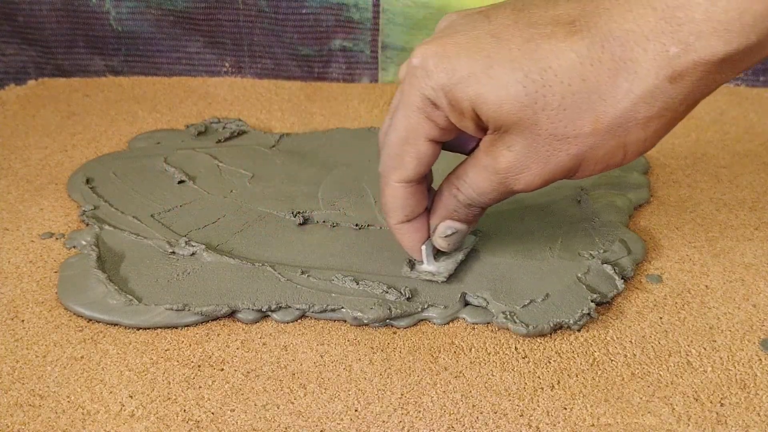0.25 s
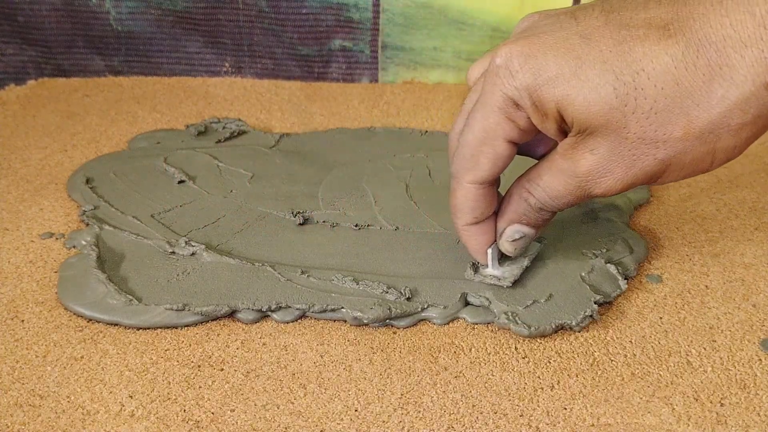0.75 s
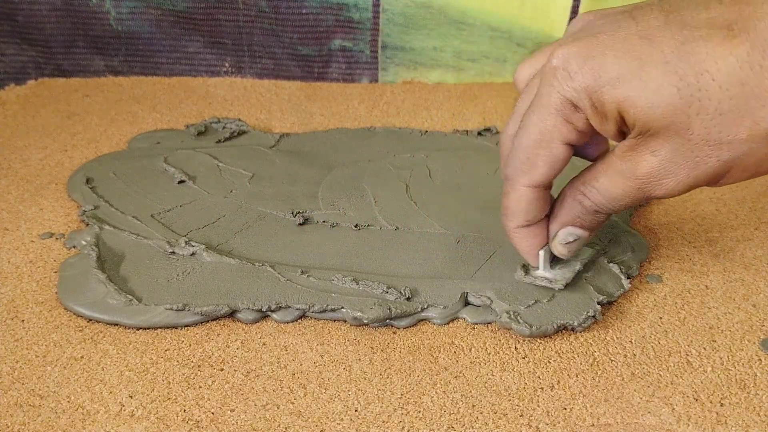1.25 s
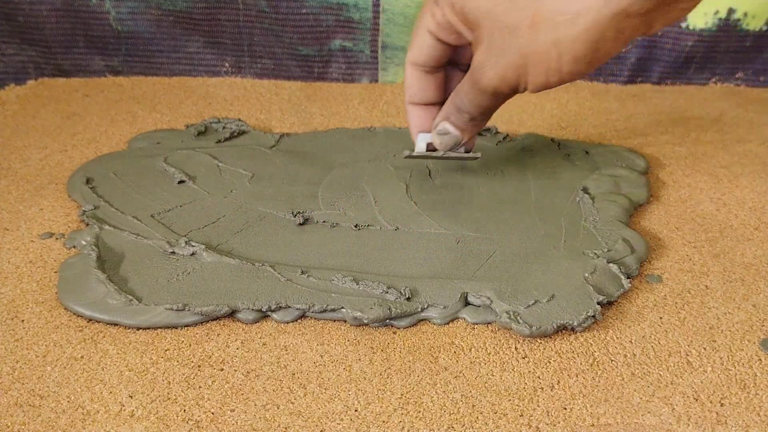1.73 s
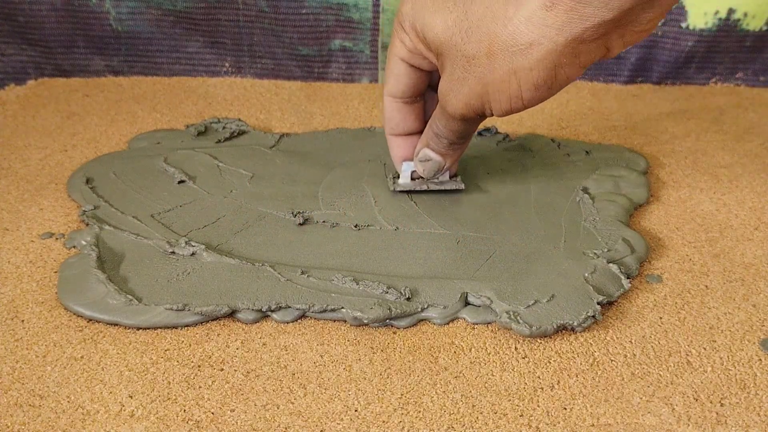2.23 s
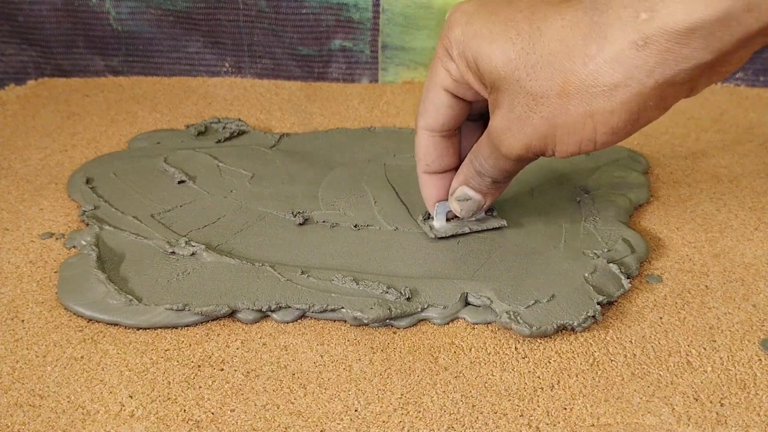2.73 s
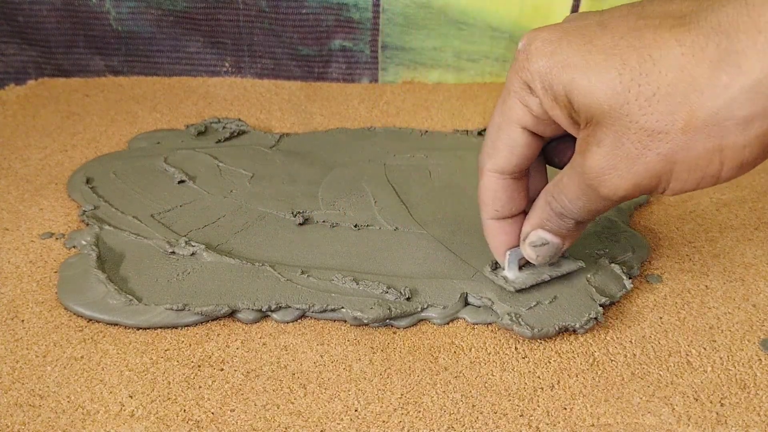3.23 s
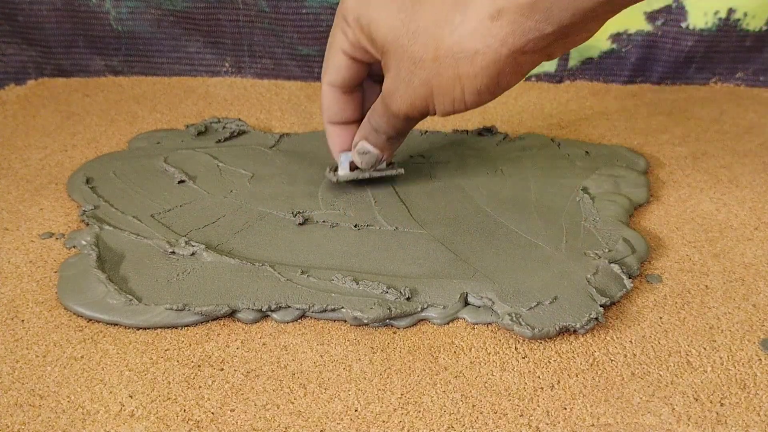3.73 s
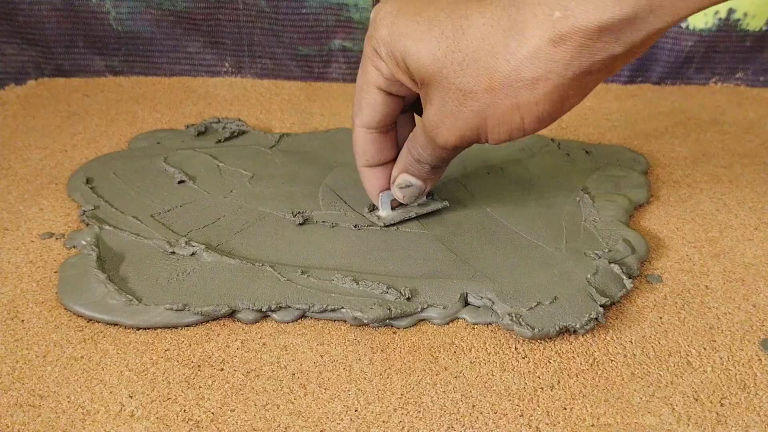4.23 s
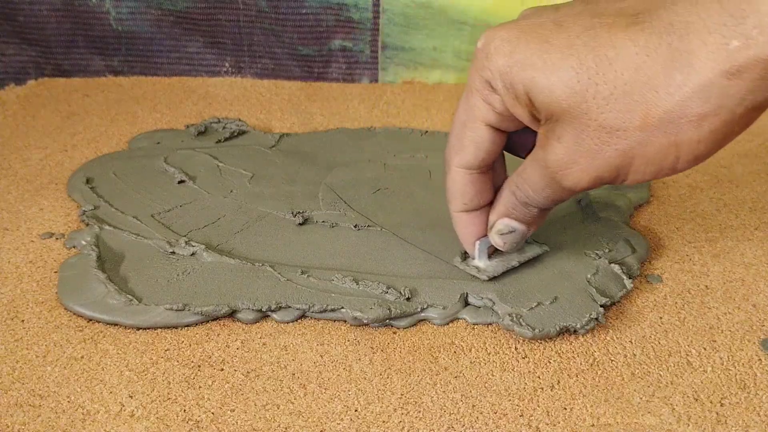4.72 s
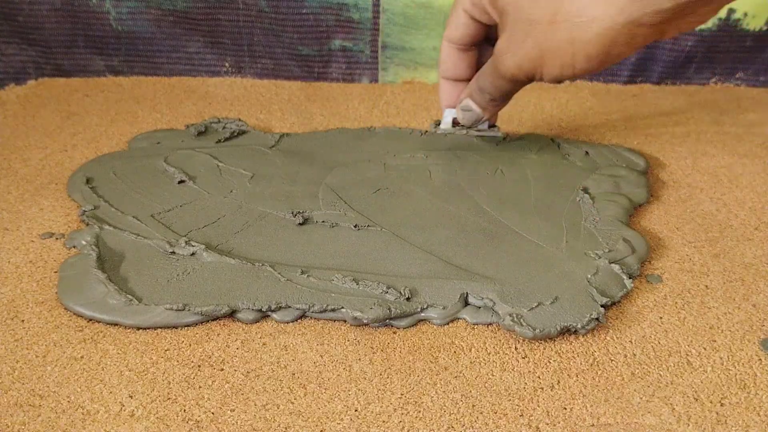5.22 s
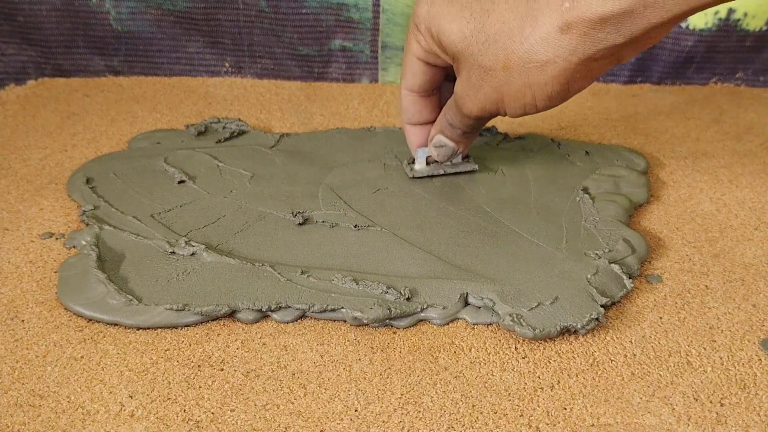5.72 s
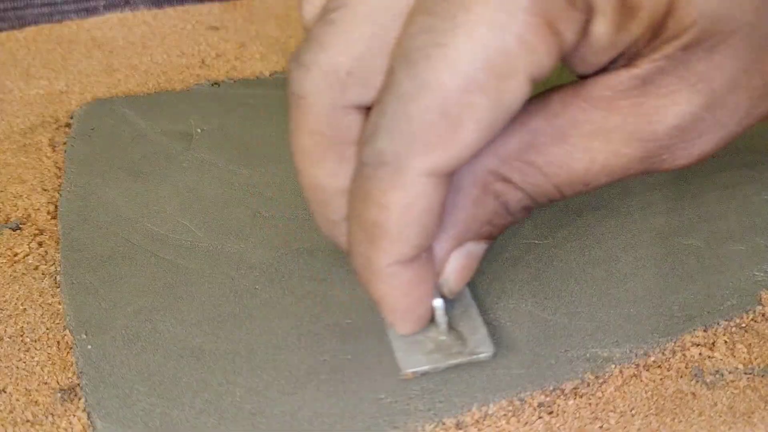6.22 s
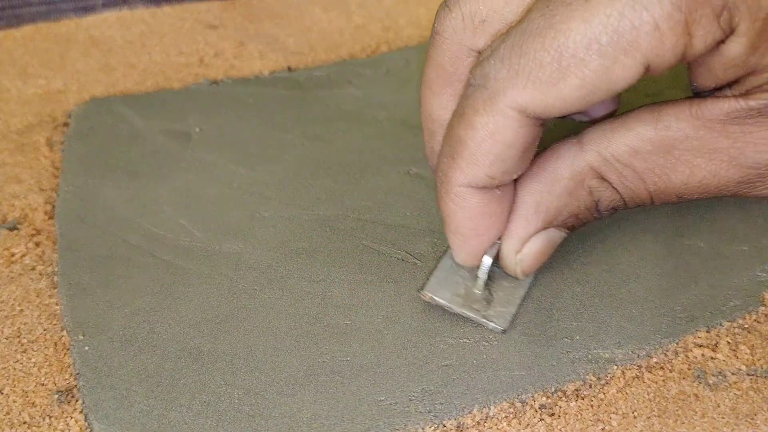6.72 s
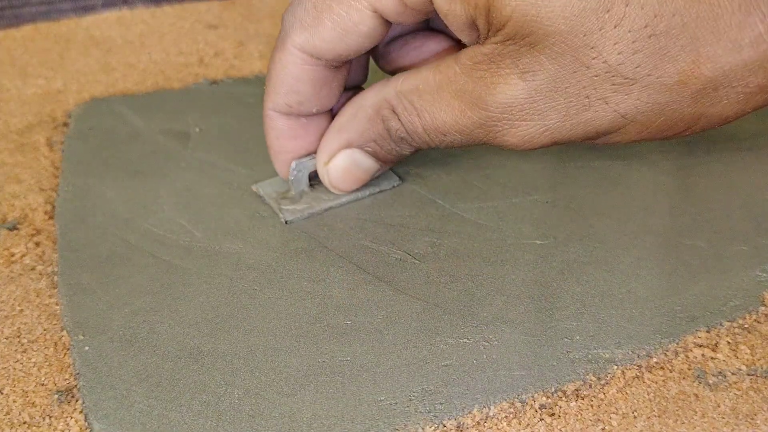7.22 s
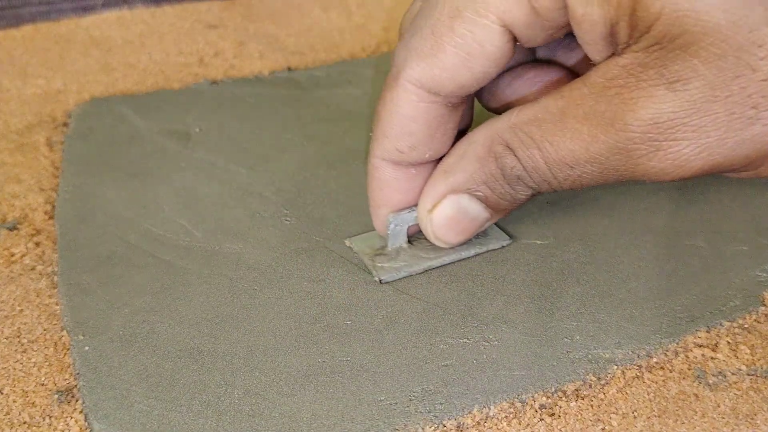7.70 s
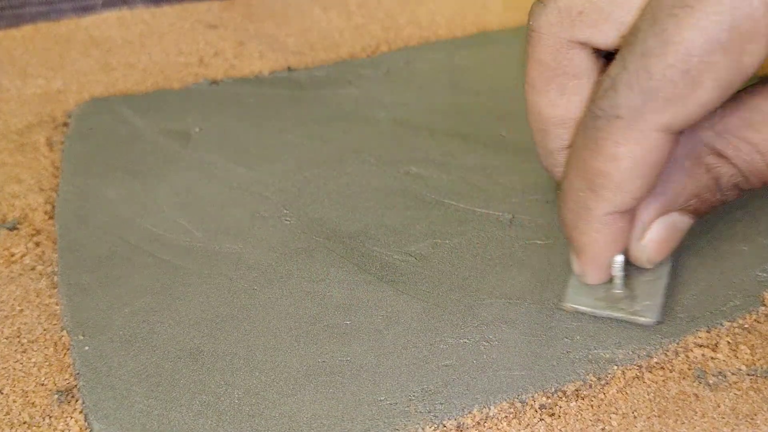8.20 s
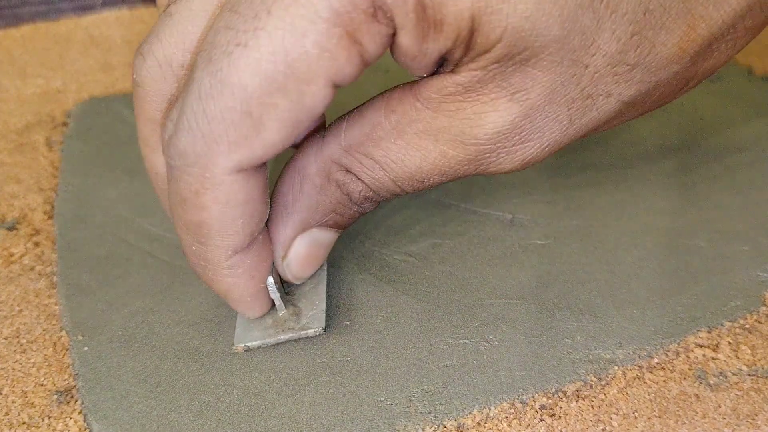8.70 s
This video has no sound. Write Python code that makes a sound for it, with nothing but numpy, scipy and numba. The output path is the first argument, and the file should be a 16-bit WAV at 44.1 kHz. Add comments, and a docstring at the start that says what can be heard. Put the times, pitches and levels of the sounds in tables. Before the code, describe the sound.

A hand draws a small steel trowel across wet cement in a quiet indoor space, heard very close and dry. Gritty, bright scrapes last under a second each, flecked with grain scratches and small catches. Each stops suddenly, and most leave a faint, thin metallic ring before the next begins. Some strokes turn hollow towards the end.

```python
"""A gritty scrape comes and goes in strokes: a steel trowel is drawn over wet cement in a quiet room.
Random clicks, the sand grains under the edge, drive resonators for the cement-damped blade and the slab,
and third-octave bands for the bare scrape. At each lift the scrape fades fast and most lifts leave the
freed blade modes ringing, as decaying sines. Faint ticks, bench rumble, rubbing and a room floor lie below."""
import sys
import numpy as np
from scipy import signal
from scipy.io import wavfile
from numba import njit

SR = 44100
rng = np.random.default_rng(int(sys.argv[2]) if len(sys.argv) > 2 else 0)


def store_pcm(level_fs):
    """Save levels as 16-bit WAV."""
    pcm = np.round(np.clip(level_fs, -1, 1) * 32767).astype(np.int16)
    wavfile.write(sys.argv[1], SR, np.atleast_2d(pcm).T)


N = 394694
STEP = 32      # samples per control step


def from_db(db):
    """Gain of a level in dB."""
    return 10 ** (np.asarray(db) / 20)


def rms_one(x):
    """Scaled to rms 1."""
    return x / np.sqrt(np.mean(x ** 2) + 1e-20)


def at_hz(points, hz):
    """A spectrum read on a log-frequency axis."""
    pitches, levels = np.array(points).T
    return np.interp(np.log(hz), np.log(pitches), levels)


def step_times():
    """Times of the control steps in seconds."""
    return np.arange(N // STEP + 1) * STEP / SR


def drift(corner_hz):
    """Slow random wander of rms 1, one value a control step: noise through a double one-pole low-pass."""
    r = np.exp(-2 * np.pi * STEP * corner_hz / SR)
    settle = 2000      # steps dropped while the filter starts up
    noise = rng.standard_normal(N // STEP + 1 + settle)
    return rms_one(signal.lfilter([1], [1, -2 * r, r * r], noise)[settle:])


def pulses(events, decay_s):
    """An envelope that jumps at each (time, level) event and dies away exponentially."""
    marks = np.zeros(N) + 1e-18
    marks[[round(e[0] * SR) for e in events]] = from_db([e[1] for e in events])
    return signal.lfilter([1], [1, -np.exp(-1 / (decay_s * SR))], marks)


def coloured(x, spectrum, level_db, patchy_db):
    """Third-octave bands, each with its level, its course level_db(Hz) and a flicker of its own."""
    out, edges = 0, 60 * 2 ** np.arange(0, 8.2, 1 / 3)
    for k, (low, high) in enumerate(zip(edges, edges[1:])):
        hz = np.sqrt(low * high)
        gain = from_db(at_hz(spectrum, hz) + level_db(hz) + patchy_db * drift(7.2))
        source = x[k % 2] * np.repeat(gain, STEP)[:N]      # neighbouring bands take different sources
        band = signal.butter(3, [low, high], "band", fs=SR, output="sos")
        out = out + signal.sosfilt(band, source + 1e-18)
    return out


@njit
def resonate(force, gain, width_hz, hz):
    """One mode whose drive, width and pitch change at every control step; a wider stage steepens its skirts."""
    out, wide, z, turn, r, r_wide, g = np.zeros(len(force)), 0j, 0j, 0j, 0., 0., 0.
    for i in range(len(force)):
        if i % STEP == 0:
            k = i // STEP
            turn = np.exp(2j * np.pi * hz[k] / SR)
            r = np.exp(-np.pi * width_hz[k] / SR)
            r_wide = np.exp(-4 * np.pi * width_hz[k] / SR)
            g = gain[k] * (1 - r_wide) * np.sqrt(1 - r)
        wide = wide * turn * r_wide + g * force[i]
        z = z * turn * r + wide
        out[i] = z.imag
    return out


# modes of the free blade: (pitch [Hz], free decay time t60 [s])
BLADE_MODES = [(608, .2), (942, .35), (1109, .2), (1324, .25), (1600, .22), (1728, .2), (1890, .55),
               (2218, .28), (2460, .6), (2536, .6), (2627, .8), (2719, .7), (2862, .33), (2966, .24),
               (3235, .33), (3397, .3), (3467, .33), (3591, .2), (3860, .2), (3994, .22), (4398, .2),
               (4942, .36), (5329, .24), (5475, .14), (5532, .3), (6121, .21), (6862, .13), (7440, .11),
               (8385, .08), (8800, .1)]
# how strongly the grit drives each of those modes: (relative level [dB])
BLADE_DRIVE = [-13, -5.5, 1.5, 4, 9, 5, 1, 0, -9, -15, -2, -36.5, -6.5, 3, -3, -20.5, -22, -2.5, -9, -6, -5,
               -13, -6.5, -12.5, -8, -6.5, -5.5, -3, -7, -9.5]
# crowded small modes and the scrape between them: (pitch [Hz], relative level [dB per Hz])
SCRAPE_SPECTRUM = [(300, -38.5), (470, -13), (720, 2), (1280, -11.5), (2120, -12.5), (2980, -8),
                   (5000, -19.5), (7870, -16.5), (10500, -12), (11700, -4.5), (13700, 0), (16000, -2)]
# broad resonances of the loaded slab under a heavy drag: (pitch [Hz], width [Hz], relative level [dB])
SLAB_MODES = [(587, 42, 8.5), (1173, 160, 3.5), (1365, 100, -9)]
# coarse grains that catch the edge: (time [s], level before the jolt gain [dB])
GRAIN_CATCHES = [(0.43, -39), (0.732, -2), (1.255, -24), (1.484, -41), (1.59, -20), (1.732, -0.5),
                 (2.034, -12.5), (2.915, -12.5), (3.48, -13.5), (3.819, -46), (4.081, -12.5), (4.262, -21),
                 (4.344, -17.5), (4.51, -15), (4.954, -29), (5.13, -23), (5.201, -5), (5.56, -12),
                 (5.874, -7), (6.186, -11), (6.464, -10), (7.155, -11), (7.264, -6.5), (8.221, -17.5),
                 (8.395, -21), (8.605, -6.5)]
# short bright scratches of single grains: (time [s], level before the scratch gain [dB])
GRAIN_SCRATCHES = [(0.4, -8), (0.4279, -10), (0.604, -9.5), (0.684, 0.5), (1.693, -20), (2.4039, -5),
                   (2.916, -8.5), (2.995, -12), (3.7149, -15), (4.9371, -13), (5.181, -7), (5.2305, -5),
                   (5.2759, -5), (5.3931, -8), (5.879, -14), (6.304, -13), (6.7281, -10), (7.1501, -22),
                   (7.261, -15), (7.3644, -7), (7.473, -17.5), (7.522, -4), (7.8554, -13), (8.418, -9)]
SCRATCH_S, SCRATCH_GAIN_DB = 0.0033, 11.5
STRAY_SCRATCHES_PER_S, STRAY_DB = 13, -17      # stray level before the scratch gain
CONTACT_DB, LIFTED_DB = -38, -58      # hiss level at full contact and with the blade clear
DAMPING_HZ = 20      # width added by the cement, before the contact factor of 0.3 to 1.3
HOLLOW_SLAB_DB, HOLLOW_GAPS_DB, HOLLOW_BELOW_HZ = 9, -45, 1900      # at hollowness 1
HOLLOW_BLADE_SHARE = 0.13      # of the drop between resonances, felt by the blade modes too
# pitches where deep drag, drag (from, to), drive and hiss rule
STROKE_HZ = [706, 1000, 1480, 4620, 10400]


def trowel():
    """Grit drives the damped blade modes, its crowded small modes, the slab and the bare scrape."""
    hiss, drive, drag, deep, _ = strokes()
    contact = np.clip((hiss - LIFTED_DB) / (CONTACT_DB - LIFTED_DB), 0, 1)
    lifted_db = -14 * (1 - contact)      # clear of the cement, small modes and scrape sink further
    hollow = hollowness()
    shake = 1.7 * drift(29.0)      # stick and slip shake all bands together, in dB

    def level_db(hz):
        """Level at a pitch: the two nearest stroke levels, blended."""
        weights = [at_hz(list(zip(STROKE_HZ, one)), hz) for one in np.eye(5)]
        return sum(w * db for w, db in zip(weights, [deep, drag, drag, drive, hiss])) + shake

    def gaps_db(hz):
        """Between the slab's resonances a hollow scrape falls quiet."""
        return HOLLOW_GAPS_DB * hollow / (1 + (hz / HOLLOW_BELOW_HZ) ** 4)

    def ring(modes, offset_db, where_db, wander):
        """The point of contact wanders over each mode's shape, and the load pulls its pitch about."""
        out = 0
        for k, (hz, width_hz, db) in enumerate(modes):
            gain = from_db(level_db(hz) + db + offset_db + where_db * drift(7.4))
            pitch = hz * (1 + wander * contact * drift(2.72))
            out = out + resonate(grains[k % 2], gain, width_hz + 0. * contact, pitch)
        return out

    grains = [grit(per_s=12000, spread_db=3.0) for side in range(2)]

    # a coarse grain jolts the blade with a burst that is duller than the fine sand
    jolts = pulses(GRAIN_CATCHES, decay_s=0.011) * from_db(18.0)
    dull = signal.butter(1, 5000, fs=SR, output="sos")
    grains = [g + signal.sosfilt(dull, g * jolts) for g in grains]

    # single grains scratch brightly, the listed ones among many random strays
    count = round(STRAY_SCRATCHES_PER_S * N / SR)
    stray_s = rng.uniform(0, N / SR - .01, count)
    strays = list(zip(stray_s, STRAY_DB + 3 * rng.standard_normal(count)))
    scratches = pulses(list(GRAIN_SCRATCHES) + strays, decay_s=SCRATCH_S) * from_db(SCRATCH_GAIN_DB)
    bright = signal.butter(1, 3000, "high", fs=SR, output="sos")
    grains = [g + signal.sosfilt(bright, g * scratches) for g in grains]

    cement_hz = DAMPING_HZ * (.3 + contact)      # clinging cement damps a little even in the air
    damped = [(hz, np.log(1000) / np.pi / t60 + cement_hz, db + HOLLOW_BLADE_SHARE * gaps_db(hz))
              for (hz, t60), db in zip(BLADE_MODES, BLADE_DRIVE)]
    crowd_hz = np.linspace(800, 15400, num=96) + rng.uniform(-57, 81, size=96)
    crowd = [(hz, 32 + 0.0052 * hz, at_hz(SCRAPE_SPECTRUM, hz) + gaps_db(hz)) for hz in crowd_hz]

    blade = ring(damped, offset_db=-15.0, where_db=5.5, wander=0.0053)
    small_modes = ring(crowd, offset_db=lifted_db - 7, where_db=5.5, wander=0.0056)
    slab = ring(SLAB_MODES, offset_db=-10 + HOLLOW_SLAB_DB * hollow, where_db=3.5, wander=0.048)
    scrape = from_db(-13.0) * coloured(
        grains, SCRAPE_SPECTRUM, lambda hz: level_db(hz) + lifted_db + gaps_db(hz), patchy_db=10.5)
    no_bass = signal.butter(6, 430, "high", fs=SR, output="sos")      # a small blade radiates no bass
    return signal.sosfilt(no_bass, blade + small_modes + slab + scrape)


def grit(per_s, spread_db):
    """Sand grains crossing the edge: dense clicks of uneven size; rms 1."""
    sizes = from_db(spread_db * np.minimum(rng.exponential(1, N), 5)) * rng.choice([-1, 1], N)
    return rms_one(sizes * (rng.random(N) < per_s / SR))


# strokes: (lands [s], lifts [s], attack [s], first touch below full [dB],
#   edge hiss early, late [dB], blade drive re hiss early, late [dB], drag re hiss early, late [dB],
#   swell of drive and drag before the lift [dB], hiss fade after the lift [dB per s],
#   hiss that lingers after the lift [dB]); levels are relative drive levels
TROWEL_STROKES = [(0.0, 0.79, 0.15, -3.5, -25.5, -29, 4, -3, -8, -13, 7.5, 463, -80),
                  (1.158, 2.051, 0.022, -6.5, -26, -25.5, 3.5, -4.5, -5, -7, 3.5, 506, -75),
                  (2.348, 3.183, 0.013, -8.5, -25, -25, -0.5, -5, -3.5, -18.5, 14, 596, -42.5),
                  (3.478, 3.553, .004, -6, -34, -24, 15, -3.5, 2, -18.5, -6.5, 520, -82),
                  (3.667, 4.521, 0.066, -24, -24, -28.5, 2.5, -1, -4.5, -7, 0, 560, -80),
                  (4.874, 5.604, 0.004, -1, -21.5, -27.5, -7.5, -0.5, -11, -12, 7, 450, -83.5),
                  (5.873, 6.834, 0.1, -8, -24.5, -27, 5, -8, -4.5, -13, 5.5, 525, -82),
                  (7.147, 7.899, 0.0038, -2, -25.5, -26.5, 0.5, -4, -8, -12.5, 4, 516, -81.5),
                  (8.211, 9.012, 0.052, -4.5, -26.5, -24.5, 3, -11, -4.5, -14.5, 11, 500, -79)]
# the stroke falters: (time [s], half-length [s], change of hiss [dB], change of drive and drag [dB])
STROKE_FALTERS = [(0.59, 0.046, -0.5, 3), (1.749, 0.077, -10.5, -14), (2.893, 0.045, -10.5, -5.5),
                  (3.531, 0.047, -15, 9), (3.726, 0.087, -4, -20), (4.917, 0.049, -13.5, 2),
                  (5.96, 0.067, -3, -12), (6.638, 0.064, -3.5, -12), (7.196, 0.084, -8, -4.5),
                  (7.764, 0.12, -2.5, 2), (8.707, 0.11, -10.5, 2)]
# low end, in eight lists, the fourth covering the short fourth stroke and the fifth:
#   (time [s], deep drag level [dB], rubbing level [dB])
STROKE_LOWS = [
    [(0.0, -67, -57), (0.208, -65, -56), (0.338, -95, -104), (0.404, -52, -50.5), (0.504, -45, -71),
     (0.78, -42.5, -54)],
    [(1.17, -52, -60), (1.406, -41, -55), (1.592, -61, -62), (1.724, -52.5, -99), (1.908, -50.5, -49),
     (2.06, -46.5, -65)],
    [(2.37, -53, -63), (2.694, -72, -63), (2.768, -55, -56.5), (2.954, -46, -58), (3.068, -50.5, -78),
     (3.19, -45.5, -80)],
    [(3.49, -37, -55), (3.676, -83, -84), (3.798, -45.5, -64.5), (4.178, -39.5, -48), (4.224, -39, -69),
     (4.52, -50, -61)],
    [(4.89, -42, -70), (4.954, -46, -68), (5.098, -80, -99), (5.208, -46, -39), (5.44, -50.5, -70),
     (5.62, -46, -99)],
    [(5.89, -52, -72), (5.924, -49.5, -77), (6.582, -43, -71), (6.66, -54.5, -75.5), (6.792, -38, -66),
     (6.84, -58, -81)],
    [(7.16, -56, -53), (7.218, -84, -65), (7.284, -61, -49), (7.464, -70, -64), (7.512, -56, -59),
     (7.9, -41, -59)],
    [(8.23, -59, -66), (8.326, -44, -56), (8.59, -47, -55), (8.718, -44, -93), (8.816, -69, -59),
     (8.93, -36, -53)],
]
# fades after the lift, for deep drag, drag and drive: (rate [dB per s])
BODY_FADES = [387.5, 343, 298.5]
LINGER_FADE_DB_PER_S = 130
BODY_LAG = 1.38      # drive and drag start this many times as far down as the hiss
ARCH_DB, SWELL_S = 7, .2      # the blade is driven hardest partway along; swell before the lift


def strokes():
    """Each stroke's course as hiss, drive, drag, deep drag and rubbing in dB at each control step."""
    t = step_times()
    silent_db = -130.
    levels = np.full((5, len(t)), silent_db)
    s, deep, rubbing = np.concatenate(STROKE_LOWS).T
    falter = sum(np.outer(db, np.clip(1 - abs(t - at) / half_s, 0, 1))
                 for at, half_s, *db in STROKE_FALTERS)
    for land, lift, attack_s, touch_db, *ends_db, swell_db, fade, linger_db in TROWEL_STROKES:
        along = np.clip((t - land) / (lift - land), 0, 1)
        since_lift = np.maximum(t - lift, 0)
        hiss, drive, drag = [np.interp(along, [0, 1], ends) for ends in np.reshape(ends_db, (3, 2))]
        attack = touch_db * np.clip(1 - (t - land) / max(attack_s, .002), 0, 1)
        swell = swell_db * np.clip(1 - (lift - t) / SWELL_S, 0, 1)
        body = hiss + BODY_LAG * attack + falter[1] + swell
        arch = ARCH_DB * np.sin(np.pi * np.sqrt(along))
        deep_fade, drag_fade, drive_fade = np.outer(BODY_FADES, since_lift)
        lingering = np.where(t > lift, linger_db - LINGER_FADE_DB_PER_S * (t - lift), silent_db)
        now = [np.maximum(hiss + attack + falter[0] - fade * since_lift, lingering),
               body + drive + arch - drive_fade,
               body + drag - drag_fade,
               np.interp(t, s, deep) - deep_fade,
               np.interp(t, s, rubbing) - deep_fade]
        levels[:, t >= land] = np.maximum(now, silent_db)[:, t >= land]
    return levels


# the scrape turns hollow, gathering in the slab's resonances: (from [s], to [s], depth [0-1])
HOLLOW_SPANS = [(1.615, 2.102, 0.96), (3.0, 3.245, 0.9), (4.236, 4.596, 0.93), (6.325, 6.91, 0.8),
                (8.654, 8.955, 0.7)]
HOLLOW_EDGE_S = 0.056


def hollowness():
    """0 in the open scrape, ramping up to each span's depth where it is hollow."""
    t = step_times()
    return sum(depth * np.clip(np.minimum(t - start, end - t) / HOLLOW_EDGE_S, 0, 1)
               for start, end, depth in HOLLOW_SPANS)


# blade modes left ringing, one list a lift: (nearest mode [Hz], peak level [dB])
LIFT_RINGS = [
    [(2627, -58), (2719, -52.5), (3235, -41.5), (3397, -43), (3467, -40)],
    [(1324, -41.5), (1890, -40), (2862, -45), (3397, -38.5), (3467, -37)],
    [(942, -44.5), (2536, -48.5), (2627, -40.5), (2719, -42), (5329, -48), (5532, -34), (6121, -42)],
    [(2862, -47), (2966, -34), (3397, -43), (3467, -39.5), (4942, -49)],
    [(1890, -48), (2862, -42.5), (3397, -43), (3467, -48.5)],
    [(1890, -59), (2627, -54.5), (4942, -46)],
    [(2218, -46), (2719, -51), (3467, -51)],
    [(942, -49), (2218, -44), (3397, -40), (4942, -49.5), (5329, -48.5)],
    [],
]
FREED_S = 0.027      # from the lift to the peak of the ring


def ring_out():
    """Freed modes swell as the cement lets go, decay, and are stilled once the blade lands again."""
    lead = SR // 20      # samples of swell before the peak
    out, t = np.zeros(N), np.arange(-lead, SR // 2) / SR
    for stroke, following, rings in zip(TROWEL_STROKES, TROWEL_STROKES[1:], LIFT_RINGS):
        peak_s = stroke[1] + FREED_S
        landed = np.maximum(t - (following[0] + following[2] - peak_s), 0)      # since its attack ended
        at = round(peak_s * SR) - lead
        swell = np.clip(1 + 20 * t, 0, 1) ** 2
        for near_hz, db in rings:
            hz, t60 = min(BLADE_MODES, key=lambda mode: abs(mode[0] - near_hz))
            level = from_db(db - 60 * t / t60 - 60 * landed / 0.24) * swell
            out[at:at + len(t)] += level * np.sin(2 * np.pi * hz * t + rng.uniform(0, 2 * np.pi))
    return out


# faint ticks in a pause: (time [s], level before the band-pass [dB])
PAUSE_TICKS = [(4.741, -39), (4.751, -40.5), (4.761, -46)]


def ticks():
    """Tiny dull clicks: noise bursts that die within milliseconds, band-passed."""
    band = signal.butter(3, [1000, 2800], "band", fs=SR, output="sos")
    return signal.sosfilt(band, rng.standard_normal(N) * pulses(PAUSE_TICKS, decay_s=0.0013))


# heavy pushes on the blade that rumble in the bench:
#   (time [s], peak level before the lumpiness [dB], fall to either side [dB per s])
BENCH_PUSHES = [(.14, -75, 94.5), (1.45, -72, 54.5), (2.05, -79, 90), (2.7, -76, 40), (3.49, -73, 196),
                (4.08, -59, 75), (5.22, -70, 119), (6.25, -64, 67), (7.18, -64.5, 90), (8.47, -60.5, 85)]
RUMBLE_REST_DB, RUBBING_REST_DB = -89.5, -88.5      # lowest levels before the lumpiness


def bench():
    """Dull rumble and a lumpy rubbing note just above it, both band-passed noise."""
    t, out = step_times(), 0
    rumble_db = np.max([db - fall * abs(t - s) for s, db, fall in BENCH_PUSHES], axis=0)
    rubbing_db = strokes()[4]
    for db, edges_hz, lumpy_db in [(np.maximum(rumble_db, RUMBLE_REST_DB), [55, 220], 3.5),
                                   (np.maximum(rubbing_db, RUBBING_REST_DB), [295, 460], 4.5)]:
        band = signal.butter(3, edges_hz, "band", fs=SR, output="sos")
        noise = rms_one(signal.sosfilt(band, rng.standard_normal(N)))
        out = out + noise * np.interp(np.arange(N) / SR, t, from_db(db + lumpy_db * drift(4.0)))
    return out


ROOM_T60_S, ROOM_DB = 0.073, -28      # decay time below the treble; tail level


def room(x):
    """A short diffuse tail of decaying noise, the treble lasting half as long again."""
    t = np.arange(SR // 2) / SR
    tail = rng.standard_normal((2, len(t))) * from_db(-60 * t / [[ROOM_T60_S], [1.5 * ROOM_T60_S]])
    low = signal.sosfilt(signal.butter(2, 5000, fs=SR, output="sos"), tail[0])
    high = signal.sosfilt(signal.butter(2, 5000, "high", fs=SR, output="sos"), tail[1])
    return signal.fftconvolve(x, (low + high) / np.linalg.norm(low + high))[:N]


# room floor, shape only: (pitch [Hz], relative level [dB per Hz])
FLOOR_SPECTRUM = [(60, -24), (150, -23.5), (400, 2.5), (800, 5), (2000, 1), (4000, -6.5), (5800, -7.5),
                  (6600, -33), (9000, -47)]
FLOOR_DB = -70      # rms


def room_floor():
    """Faint steady noise whose bands flicker gently."""
    noise = rng.standard_normal((2, N))
    return from_db(FLOOR_DB) * rms_one(coloured(noise, FLOOR_SPECTRUM, lambda hz: 0, patchy_db=4.1))


def scene():
    """Trowel, ring, ticks, their room tail, bench and floor."""
    near = trowel() + ring_out() + ticks()
    return (near + from_db(ROOM_DB) * room(near) + bench() + room_floor())[None]


CUTOFF_HZ = 15520


def record(dry):
    """A steep low-pass cuts the top."""
    return signal.sosfilt(signal.ellip(12, .3, 75, CUTOFF_HZ, fs=SR, output="sos"), dry)


dry = scene()
out = record(dry)
store_pcm(out)
```